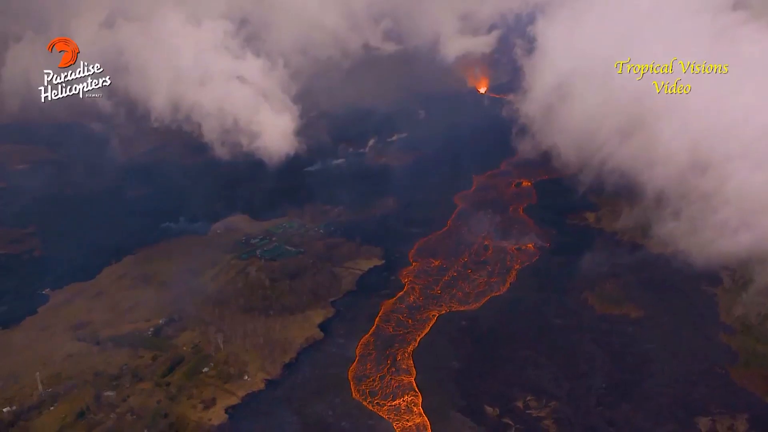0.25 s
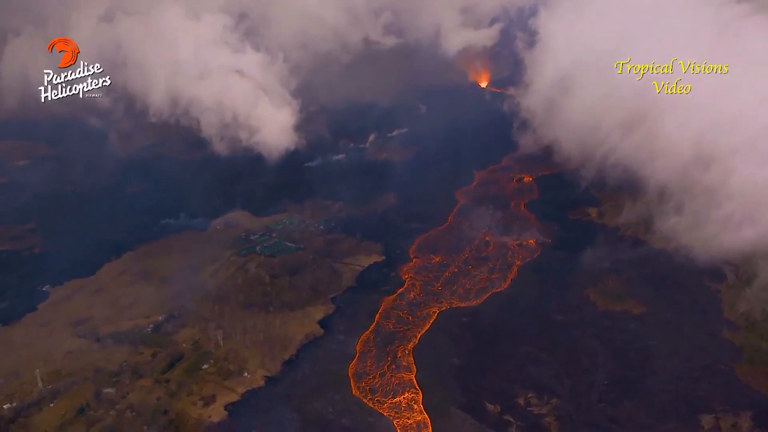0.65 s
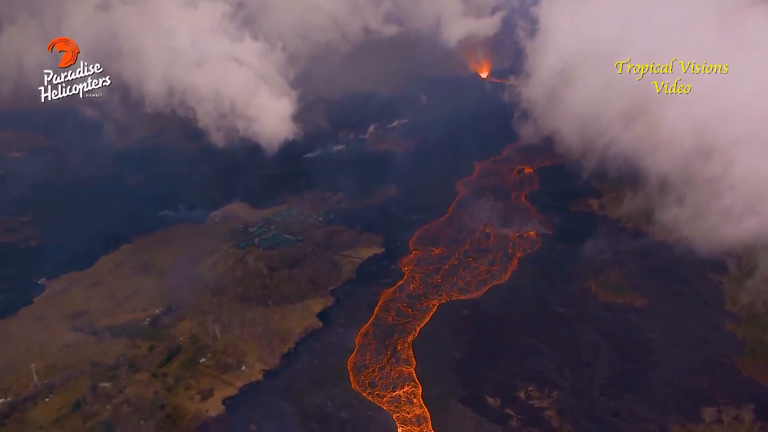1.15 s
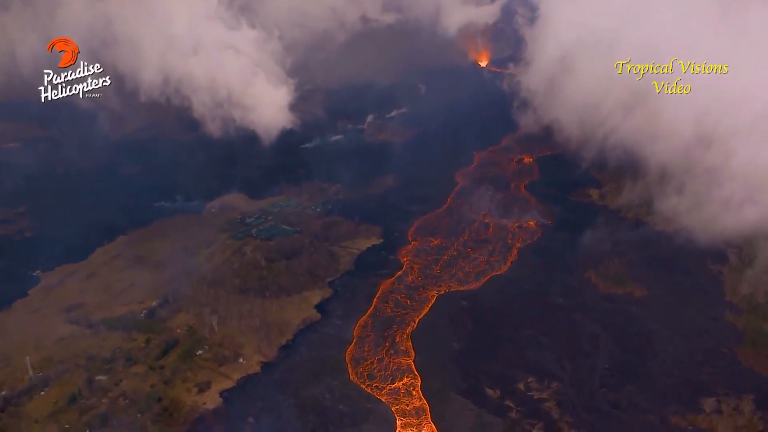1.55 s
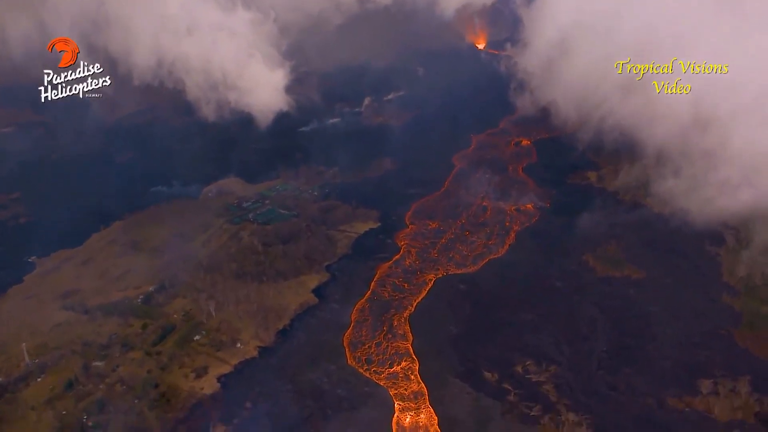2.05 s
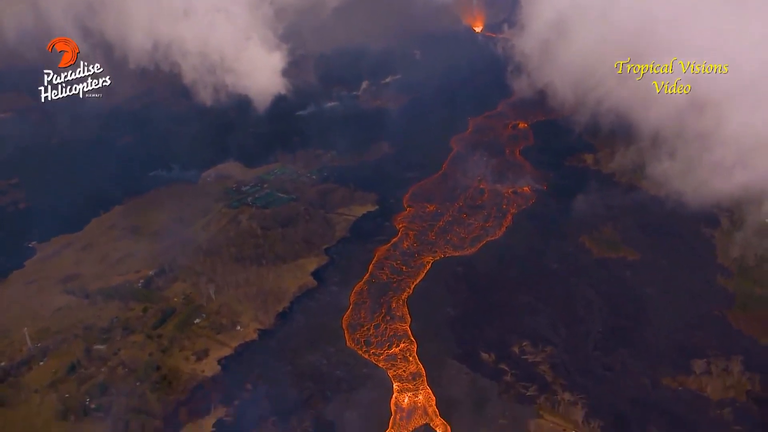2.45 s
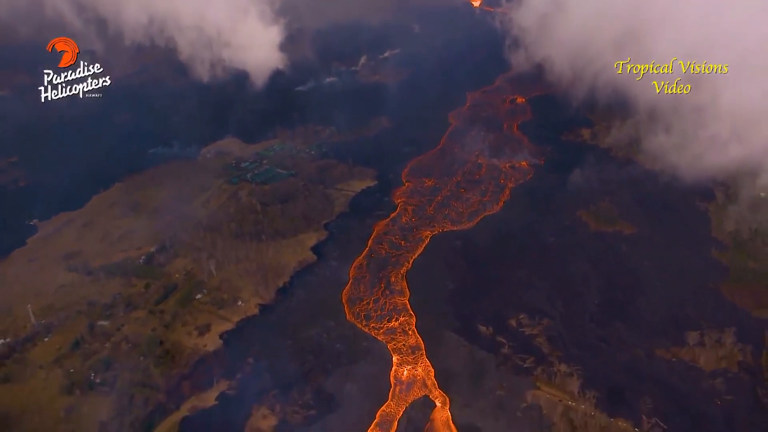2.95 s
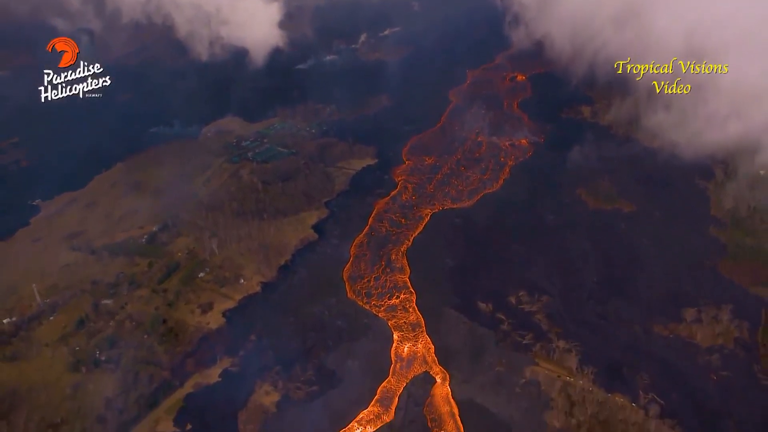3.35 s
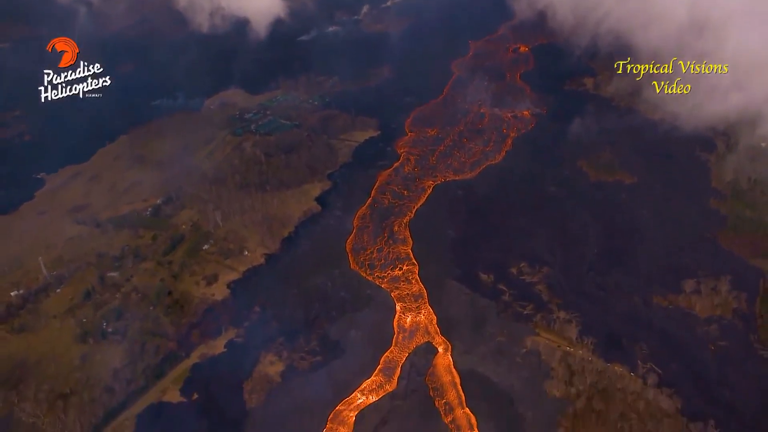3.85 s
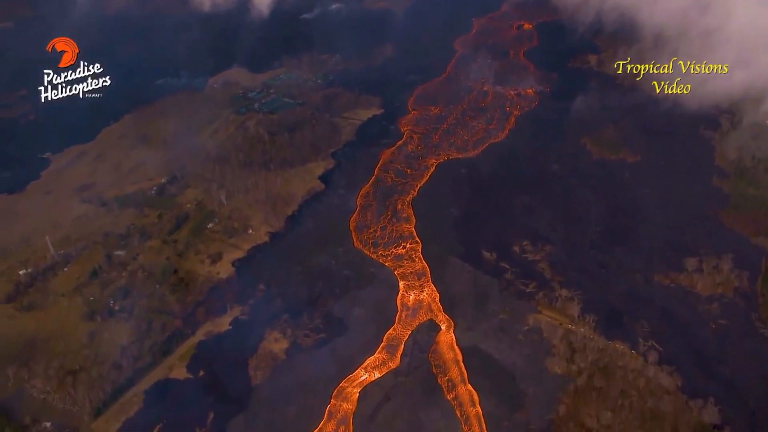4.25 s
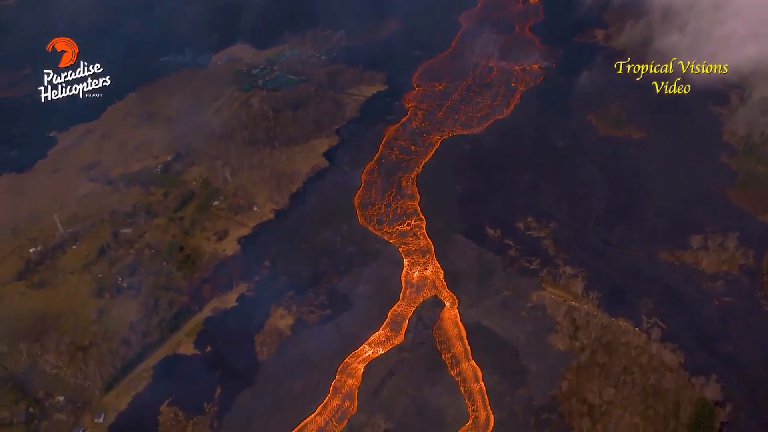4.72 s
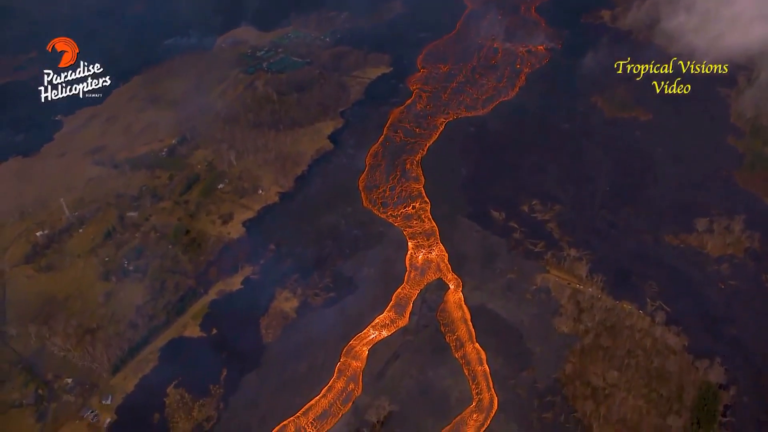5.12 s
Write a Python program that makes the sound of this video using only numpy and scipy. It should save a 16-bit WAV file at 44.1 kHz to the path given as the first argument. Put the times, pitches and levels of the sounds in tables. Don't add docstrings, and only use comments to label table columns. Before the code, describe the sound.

Aboard a helicopter in flight, a thick engine rush with a high whine and fast, shallow rotor throb rises from silence and holds steady. Around the middle the microphone leans out of the doorway; gear tones dull, the machine drops back, and irregular slipstream thumps and crackles take over, loud, close and slightly squashed by limiting.

```python
import sys
import numpy as np
from scipy import signal
from scipy.fft import rfft, irfft, next_fast_len
from scipy.io import wavfile
from scipy.ndimage import uniform_filter1d

SR = 44100
rng = np.random.default_rng(int(sys.argv[2]) if len(sys.argv) > 2 else 0)


def inscribe(sig):
    pcm = np.round(np.clip(np.atleast_2d(sig).T, -1, 1) * 32767)
    wavfile.write(sys.argv[1], SR, pcm.astype(np.int16))


def invert_db(level):
    return 10 ** (np.asarray(level, dtype=float) / 20)


N = 237516

# shaft_multiple, level_db
SHAFT_TONES = [(2, -39), (10, -48), (11, -50), (15, -50), (19, -48), (24, -37), (32, -51), (33, -57),
               (34, -56), (36, -63), (38, -51), (44, -62), (48, -66), (50, -60), (53, -63), (55, -65),
               (57, -60), (64, -52)]
# shaft_multiple, level_db
SUM_TONE = [(7.871, -44)]
# pump_multiple, level_db
PUMP_TONES = [(1, -58), (2, -48), (3, -46), (4, -46), (5, -51), (6, -51)]
# tail_multiple, level_db
TAIL_TONES = [(7, -52), (8, -48), (11, -45), (12, -44), (15, -44), (16, -39), (17, -37), (20, -49),
              (21, -50), (22, -49), (24, -48), (25, -49), (29, -50), (34, -43), (37, -47), (39, -48),
              (40, -51), (55, -52)]
# blade_pass_multiple, level_db
MAIN_TONES = [(3, -55), (6, -52), (7, -48), (11, -49), (12, -50), (15, -51), (19, -48), (20, -50),
              (24, -48), (27, -51)]
# time_s, machine_gain_db, gear_shadow_db
CAMERA = [(.2, 2, -0.5), (1.0, 1.4, 1.2), (2.0, 1.9, 1.5), (2.25, 1.6, -2.5), (2.45, 0.7, .3),
          (3.0, -.8, -4.5), (3.3, -1.3, -11.5), (3.6, -3.5, -15.5), (4.0, -3, -15), (4.13, -6, -9),
          (4.4, -2.5, -15.5), (4.6, -4.5, -16), (4.9, -2, -16), (5.38, -3, -18)]
# time_s, level_db
TAIL_HIDDEN = [
    (2.6, 1.5),
    (2.85, -4),
    (4.5, -8),
]
# frequency_hz, density_db
ENGINE_SPECTRUM = [(15, -58.5), (25, -31), (150, -11.5), (493, -3), (668, -8), (777, -5.5), (1840, -9.5),
                   (2680, -9.5), (4680, -20.5), (6000, -21.5), (6830, -15.5), (8360, -30), (9200, -35.5),
                   (10800, -45.5)]
# frequency_hz, density_db
WIND_SPECTRUM = [(15, -50), (30, -40), (133, -1), (349, 5), (540, 3), (592, 2), (664, 3.5), (1230, 0.5),
                 (2750, -20), (4660, -33.5), (6000, -63), (7800, -67.5), (13200, -120)]
# time_s, level_db
EXPOSURE = [
    (1.0, -40.5),
    (1.8, -37),
    (2.5, -31.5),
    (3.0, -31),
    (3.5, -31.5),
    (4.0, -29.5),
    (4.2, -30.5),
    (4.75, -28.5),
    (5.38, -30.5),
]
# start_s, lift_db
BUFFETS = [(3.148, 6), (3.265, 13.5), (3.327, 11), (3.35, 14.5), (3.433, 9), (3.451, 6), (3.469, 13),
           (3.534, 10), (3.572, 9), (3.594, 11), (3.778, 7.5), (3.813, 18), (3.844, 16), (3.982, 17),
           (4.07, 8.5), (4.157, 13), (4.195, 11), (4.236, 12), (4.36, 13.5), (4.406, 7.5), (4.457, 14.5),
           (4.678, 10), (4.918, 11), (5.074, 8), (5.1, 4.5), (5.149, 11), (5.197, 15), (5.317, 10.5)]

TAIL_RATIO, MAIN_RATIO, PUMP_RATIO = .34535, .3964, .9466
MESH_ORDER, MESH_HZ = 24, 2457.8
SAG_HZ, SAG_START_S, SAG_S = 2.8, 1.8, 1.0


def evened(x):
    return x / np.sqrt(np.mean(x ** 2) + 1e-20)


def curve(rows, index):
    table = np.array(rows)
    return np.interp(np.arange(N) / SR, table[:, 0], table[:, index])


def colour(x, points):
    hz, db = np.transpose(points)
    f = np.fft.rfftfreq(N, 1 / SR)
    gain_db = np.interp(np.log(f + 1), np.log(hz + 1), db, right=-90)
    return evened(irfft(rfft(x) * invert_db(gain_db), N))


def wander(top_hz):
    size = next_fast_len(N, True)
    f = np.fft.rfftfreq(size, 1 / SR)
    spectrum = rfft(rng.standard_normal(size)) / (1 + (f / top_hz) ** 2)
    return evened(irfft(spectrum, size)[:N])


def shaft_turns():
    droop = np.clip((np.arange(N) / SR - SAG_START_S) / SAG_S, 0, 1)
    shaft_hz = (MESH_HZ - SAG_HZ * droop) / MESH_ORDER
    return np.cumsum(shaft_hz) / SR


def tones(orders, turns, flutter_db, blur):
    out = np.zeros(N)
    for multiple, db in orders:
        level = invert_db(db + 1.5 + flutter_db * wander(top_hz=10.0))
        phase = 2 * np.pi * (multiple * turns + rng.random()) + blur * wander(top_hz=2.9)
        out += level * np.sin(phase)
    return out


def gearing():
    turns, faded_db = shaft_turns(), curve(CAMERA, index=2)
    gears = tones(SHAFT_TONES[1:], turns, flutter_db=1.5, blur=.25) * invert_db(faded_db + .5)
    low_tones = [*SHAFT_TONES[:1], *SUM_TONE]
    gears += tones(low_tones, turns, flutter_db=.8, blur=.15) * invert_db(.5 * faded_db + 1)
    pump = tones(PUMP_TONES, PUMP_RATIO * turns, flutter_db=2, blur=.3) * invert_db(.7 * faded_db - 1.5)
    tail = tones(TAIL_TONES, TAIL_RATIO * turns, flutter_db=1.5, blur=.2)
    tail *= invert_db(curve(TAIL_HIDDEN, index=1))
    main = tones(MAIN_TONES, MAIN_RATIO * turns, flutter_db=2, blur=.3) * invert_db(.6 * faded_db)
    return gears + pump + tail + main


def turbine():
    frames = N // 128 + 5
    real, imaginary, patches = rng.standard_normal((frames, 257, 3)).T
    patches = uniform_filter1d(patches, 8, 0)
    patches = evened(uniform_filter1d(patches, 20, 1))
    spectra = (real + 1j * imaginary) * invert_db(0.5 * patches)
    noise = signal.istft(spectra, nperseg=512, noverlap=384)[1][:N]
    angle = 2 * np.pi * shaft_turns()
    throb_db = 0.5 * np.cos(MAIN_RATIO * angle) + 0.41 * np.cos(2 * MAIN_RATIO * angle)
    throb_db += 0.57 * np.cos(PUMP_RATIO * angle)
    roar = colour(noise * invert_db(throb_db + 1.24 * wander(top_hz=30)), ENGINE_SPECTRUM)
    return roar * invert_db(-29.5 + curve(CAMERA, index=1))


def slipstream():
    gust_db = np.minimum(4.2 * wander(top_hz=150), 7)
    gust_db -= .7 * uniform_filter1d(gust_db, 900)
    gust_db += 0.56 * wander(top_hz=25)
    gust_db += 0.63 * np.cos(2 * np.pi * MAIN_RATIO * shaft_turns())
    gust_db += buffeting()
    eddies = rng.standard_normal(N) * invert_db(gust_db)
    pop_db = 3.66 * np.minimum(rng.exponential(1, N), 4) + gust_db
    struck = rng.random(N) < 400 / SR
    pops = invert_db(pop_db) * struck * rng.choice([-1., 1.], N)
    body = colour(evened(eddies) + 0.83 * evened(pops), WIND_SPECTRUM)
    bright = signal.sosfilt(signal.butter(2, 1800, "high", fs=SR, output="sos"), body)
    wind = body + bright * (invert_db(0.5 * gust_db + 5.0) - 1) + door_frame()
    return wind * invert_db(curve(EXPOSURE, index=1) + 5.0)


def buffeting():
    kicks = np.zeros(N)
    for start_s, lift_db in BUFFETS:
        kicks[round(start_s * SR)] = lift_db
    t = np.arange(1200) / SR
    swell = np.exp(-t / .0035) * (1 - np.exp(-t / .0003))
    return signal.oaconvolve(kicks, swell)[:N]


def door_frame():
    return 0.11 * colour(rng.standard_normal(N), [(20, -21.5), (60, -7.0), (130, 7), (300, -17)])


def scene():
    return (gearing() + turbine() + slipstream())[None]


def band_limit(x):
    return signal.sosfilt(signal.butter(12, 10500, fs=SR, output="sos"), x)


def record(dry):
    limit, knee = .158, 6
    start_s, fade_s = .088, 0.94
    limited = dry / (1 + abs(dry / limit) ** knee) ** (1 / knee)
    limited = signal.sosfilt(signal.butter(2, 38, "high", fs=SR, output="sos"), limited)
    fade = np.sin(np.pi / 2 * np.clip((np.arange(N) / SR - start_s) / fade_s, 0, 1))
    return band_limit(limited * fade)


dry = scene()
out = record(dry)
inscribe(out)
```